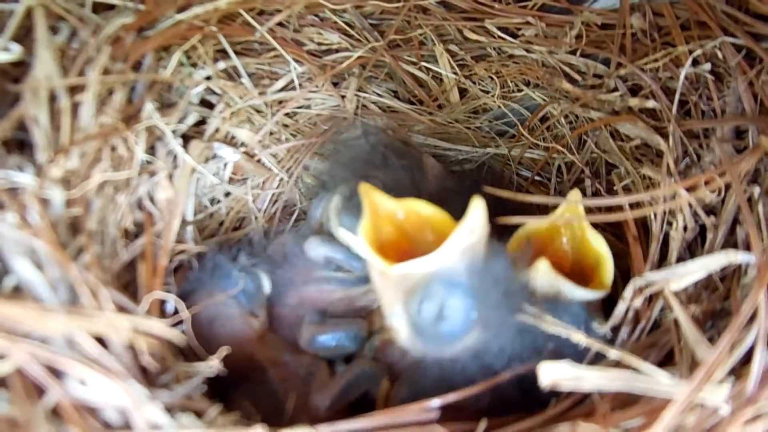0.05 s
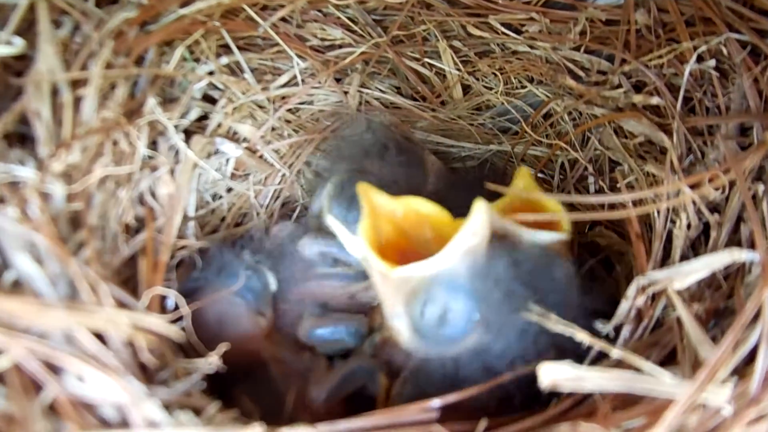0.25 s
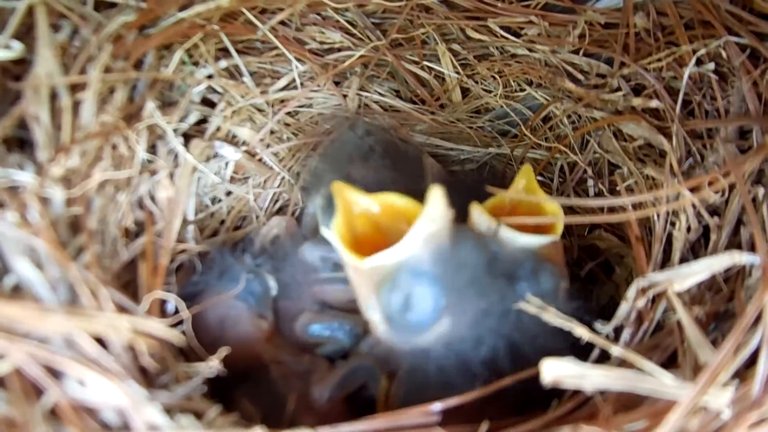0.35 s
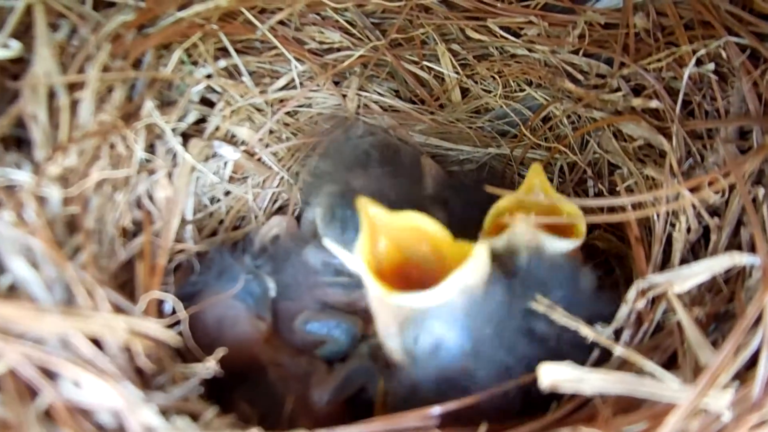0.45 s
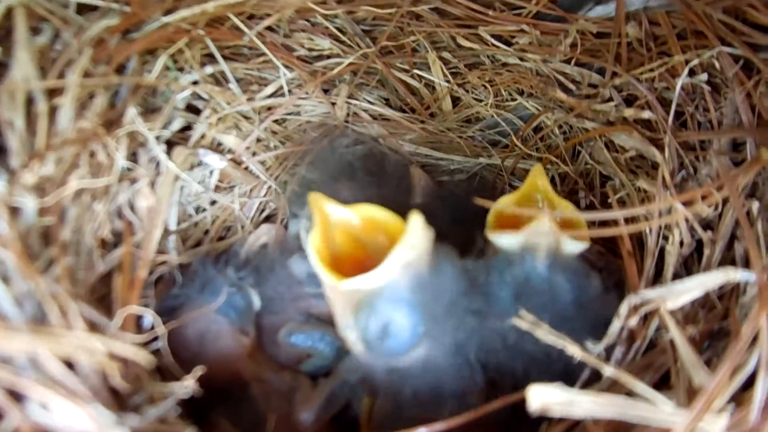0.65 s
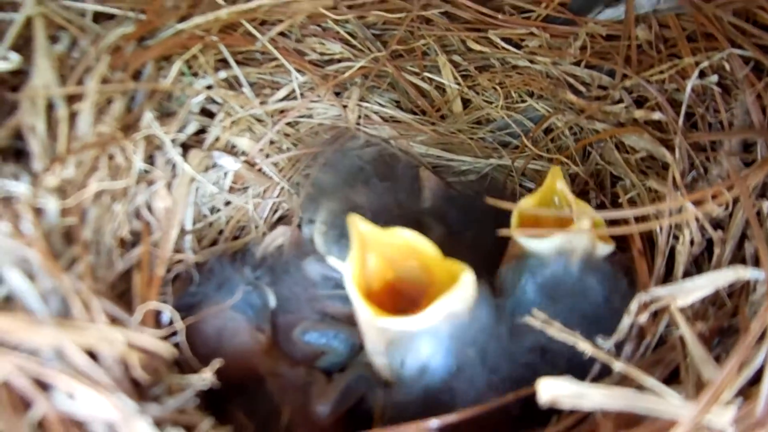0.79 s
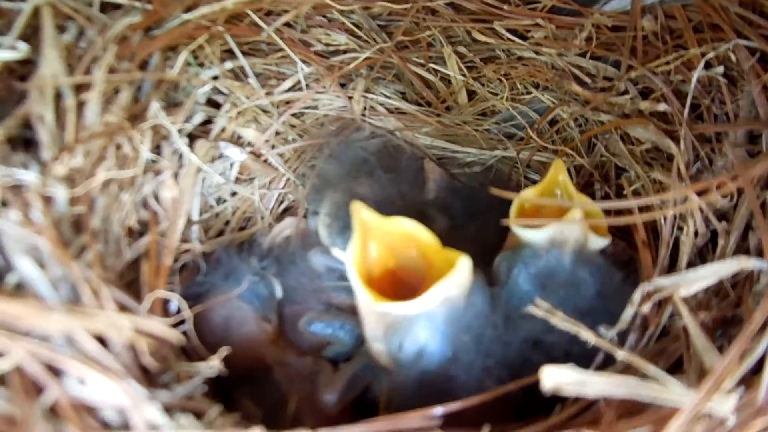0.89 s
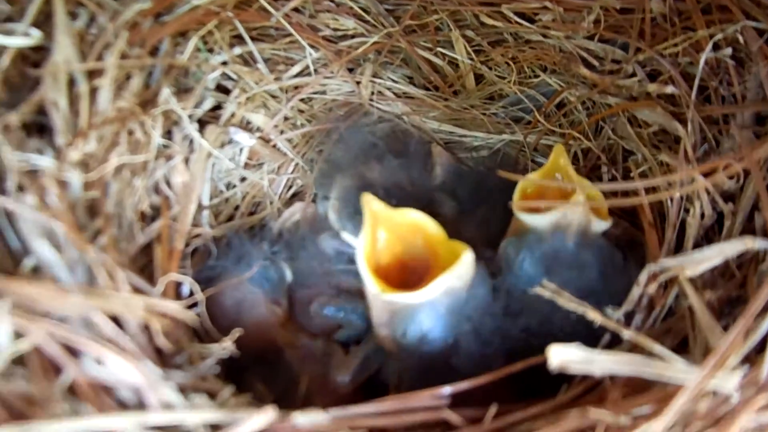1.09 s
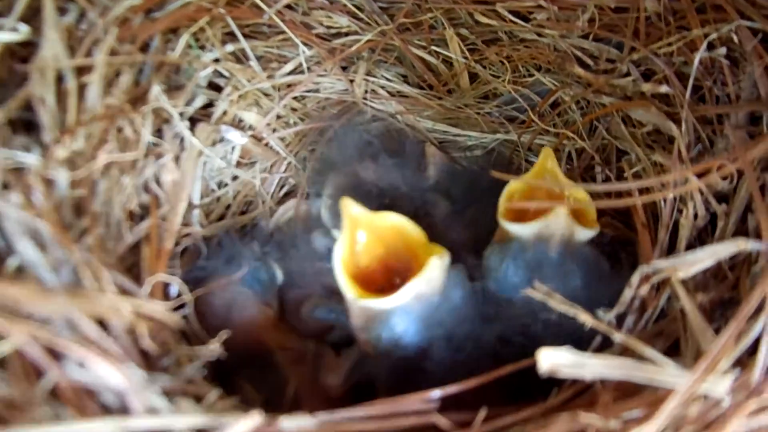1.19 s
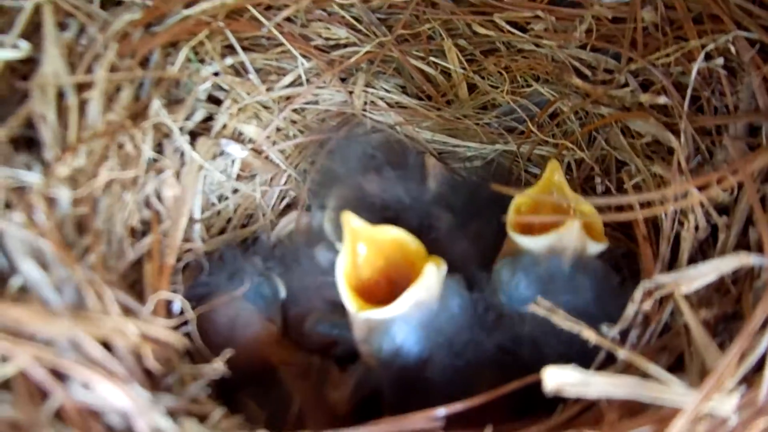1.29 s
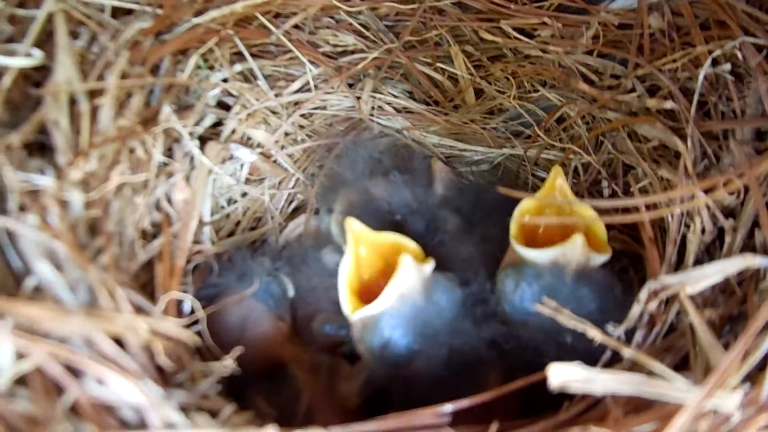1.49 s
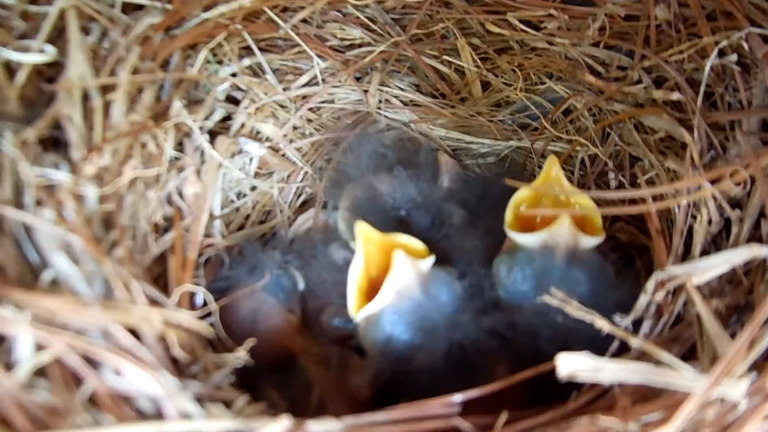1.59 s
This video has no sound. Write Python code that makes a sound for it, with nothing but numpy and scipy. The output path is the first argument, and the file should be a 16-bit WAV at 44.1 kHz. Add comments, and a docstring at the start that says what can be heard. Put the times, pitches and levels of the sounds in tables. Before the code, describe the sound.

Nestling birds beg with a thin wavering peep near the start and another at the end; between them, scuffs and hollow wooden bumps, heard very close inside a nest box with faint outdoor air.

```python
"""Nest box with nestlings begging inside: two thin, wavering peeps over quiet outdoor air.
Peeps are near-pure gliding whistles with a weak octave and a breathy rasp; air is coloured noise.
Scuffs are dense stick-slip clicks, bumps ring the modes of the wood, and the hollow rings on after both.
Snapping straws are tiny decaying bursts of narrow-band noise."""
import sys
import numpy as np
from scipy import signal
from scipy.fft import rfft, irfft
from scipy.io import wavfile
from scipy.ndimage import uniform_filter1d

SR = 44100
rng = np.random.default_rng(int(sys.argv[2]) if len(sys.argv) > 2 else 0)


def dump_mix(stems):
    """Bounce the given channels to the path in sys.argv[1] as a 16-bit WAV at rate SR."""
    frames = np.atleast_2d(stems).T  # one column per channel
    limited = np.clip(frames, -1, 1)  # hard clip at full scale
    pcm = np.round(limited * 32767).astype(np.int16)
    wavfile.write(sys.argv[1], SR, pcm)


N = 72765

# stereo width of the box's sounds: (frequency [Hz], side minus mid [dB])
BOX_WIDTH = [(100, -27), (520, -28), (800, -11.5), (1300, -2.5), (3500, 1.5), (12000, -2)]


def undb(db):
    """Decibels to amplitude gain."""
    return 10 ** (np.asarray(db) / 20)


def unit(x):
    """Scale to an rms of 1."""
    return x / np.sqrt(np.mean(x ** 2))


def walk(rate_hz):
    """Random drift with an rms of 1: white noise averaged twice over 1 / rate_hz."""
    window = int(SR / rate_hz)
    once = uniform_filter1d(rng.standard_normal(N), window)
    return unit(uniform_filter1d(once, window))


def colour(x, points):
    """Filter by a curve of (Hz, dB) points, interpolated over log frequency."""
    hz, db = np.array(points, float).T
    bin_hz = np.fft.rfftfreq(N, 1 / SR) + 1  # + 1 avoids log(0)
    gain = undb(np.interp(np.log(bin_hz), np.log(hz), db))
    return irfft(rfft(x) * gain, N)


def spread(pair, width):
    """Left and right from a mid and a side signal, the side weighted by frequency."""
    mid, side = pair[0], colour(pair[1], width)
    return np.array([mid + side, mid - side])


def band(x, hz, kind, order):
    """Butterworth filter, output at an rms of 1."""
    sos = signal.butter(order, hz, kind, fs=SR, output="sos")
    return unit(signal.sosfilt(sos, x))


def ring(modes, size=N // 4):
    """Exponentially decaying modes, one complex row each."""
    t = np.arange(size) / SR
    return np.array([undb(db - 60 * t / t60_s) * np.exp(2j * np.pi * hz * t) for hz, db, t60_s in modes])


def through(x, response):
    """Pass a sound through an impulse response by convolution."""
    return signal.fftconvolve(np.atleast_2d(x), np.atleast_2d(response), axes=1)[:, :N]


def air():
    """Quiet outdoor air: coloured noise whose level flickers slightly."""
    # noise spectrum: (frequency [Hz], relative density [dB per Hz])
    air_spectrum = [(15, -64), (25, -16.5), (99, -7), (183, -8), (227, -8), (267, -4.5), (331, 4),
                    (469, 1.5), (582, -6.5), (762, -16), (1020, -14), (1140, -13.5), (1620, -19),
                    (1900, -16.5), (3000, -23.5), (13400, -34), (14300, -43)]
    # stereo width: (frequency [Hz], side minus mid [dB])
    air_width = [(60, -16), (500, -20), (800, 1), (2000, -1), (12000, -0.5)]
    level_db, flicker_db = -53.5, .5
    noise = unit(colour(rng.standard_normal((2, N)), air_spectrum))
    return spread(noise, air_width) * undb(level_db + flicker_db * walk(30))


def scuffs():
    """Stick-slip clicks swell and die with each stroke's pressure; the straw catches and lets go."""
    # strokes: (peak time [s], rise [s per 20 dB], fall [s per 20 dB],
    #           bass, low middle, upper middle, treble, rim resonance [relative dB])
    strokes = [(0.062, 0.051, 0.067, -46.5, -37.5, -42.5, -52.5, -59),
               (0.078, 0.012, 0.016, -40.5, -26, -28.5, -40.5, -29.5),
               (0.287, 0.029, 0.075, -46, -48.5, -62, -64, -64),
               (0.346, 0.026, 0.063, -60, -43.5, -44, -54, -46),
               (0.385, 0.015, 0.021, -42, -36.5, -43, -61, -48),
               (0.562, 0.031, 0.023, -30, -32.5, -39, -50, -55),
               (0.587, 0.028, 0.029, -41, -30, -32, -39, -53),
               (0.604, 0.017, 0.021, -28, -26.5, -34, -47.5, -54),
               (0.908, 0.011, 0.042, -51.5, -50, -74, -87, -72),
               (1.237, 0.0045, 0.03, -49, -46, -49, -57.5, -58)]
    # colour of the rubbed surface: (frequency [Hz], level [dB])
    surface = [(70, -42), (150, -18), (220, -16.5), (330, 2.5), (550, -6.5), (900, -11.5), (1020, -17),
               (1300, -8), (1750, -16), (2000, -14.5), (2350, -21), (3000, -11.5), (4000, -21), (6500, -18),
               (9000, -23), (13400, -27), (14000, -51)]
    grains_per_s, grain_spread_db = 5000, 1
    bass_hz, middle_hz, treble_hz = 454, 1068, 3860  # band edges
    rim_hz, rim_width_hz = 2010, 230
    catch_db, catch_hz = 1.2, 450
    t = np.arange(N) / SR

    hits = rng.random(N) < grains_per_s / SR
    grain_db = grain_spread_db * np.minimum(rng.exponential(size=N), 3)
    slips = hits * undb(grain_db) * rng.choice([-1., 1.], (2, N))
    grit = colour(slips, surface)
    parts = [
        band(grit, bass_hz, "low", order=3),
        band(grit, [bass_hz, middle_hz], "band", order=3),
        band(grit, [middle_hz, treble_hz], "band", order=3),
        band(grit, treble_hz, "high", order=3),
        band(grit, [rim_hz - rim_width_hz / 2, rim_hz + rim_width_hz / 2], "band", order=2),
    ]
    rubbing = 0
    for peak_s, rise_s, fall_s, *levels_db in strokes:
        pressure = undb(-20 * np.maximum((peak_s - t) / rise_s, (t - peak_s) / fall_s))
        mix = sum(undb(db) * part for db, part in zip(levels_db, parts))
        rubbing = rubbing + pressure * mix
    catching = undb(catch_db * walk(catch_hz))
    return spread(rubbing * catching, BOX_WIDTH)


def bumps():
    """Soft pushes and hard ticks ring the wood; the struck spot sets the mix; deep bass barely radiates."""
    # knocks and ticks: (start [s], level [dB], contact [s], extra for the lowest mode [dB],
    #                    tilt of the modes [dB per octave])
    knocks = [(0.0617, -36, .0006, -3, 0), (0.0712, -22, .0003, 0, 1), (.0782, -25, .00025, -2, 4),
              (.0835, -33, .0003, 0, 3), (.286, -45, .002, 3, 0), (.326, -44, .0005, -6, 2),
              (.349, -47, .0003, -8, 5), (.381, -33, .0007, -10, 0), (.3872, -38, .0002, -8, 4),
              (0.5294, -14, .0017, 0, 0), (0.5581, -22, .0018, 0, 0), (0.595, -23, .0014, 4, 0),
              (0.6174, -27, .0019, 4, 0), (0.714, -41, .0016, 0, 0), (0.904, -44, .00085, -2, 0),
              (1.2345, -46, .00015, -2, 4.5), (1.2352, -34, .0013, 4, 0), (1.2695, -44, .0016, 3, 0),
              (1.358, -45, .0012, 0, 0)]
    # modes of the wooden box: (frequency [Hz], level [dB], t60 [s])
    wood = [(352, -3, .12), (484, 0, .05), (562, 0, .05), (665, -6, .04), (795, -4, .04), (1270, -13, .04),
            (1985, -8, .045), (2720, -18, .045), (3320, -17, .035), (4880, -26, .03)]
    tilt_pivot_hz, highpass_hz = 500, 250
    t = np.arange(N) / SR
    modes = ring(wood)
    index = np.arange(len(wood))
    octaves = np.log2(np.array(wood)[:, 0] / tilt_pivot_hz)
    ringing = 0
    for start_s, db, contact_s, lowest_db, tilt_db in knocks:
        push = np.sin(np.pi * np.clip((t - start_s) / contact_s, 0, 1))
        # neighbouring modes swing in opposite directions
        gains = (-1) ** index * undb(db + lowest_db * (index == 0) + tilt_db * octaves)
        knock = np.sum(gains[:, None] * modes, axis=0)
        # mid and side are a quarter cycle apart
        ringing = ringing + through(push / push.sum(), [knock.imag, knock.real])
    sos = signal.butter(2, highpass_hz, "high", fs=SR, output="sos")
    return signal.sosfilt(sos, spread(ringing, BOX_WIDTH))


def box(x):
    """The hollow's resonances ring on after each contact, with a faint dull echo of decaying noise."""
    # resonances of the hollow: (frequency [Hz], level [dB], t60 [s])
    hollow_modes = [(350, -8, .38), (376, -1, .5), (581, -4, .3), (619, 3, .42), (678, -6, .45),
                    (764, 4, .25), (813, -5, .5), (845, 0, .25), (892, 5, .45), (1253, -3, .35),
                    (1302, 0, .38)]
    hollow_peak_db = 7.5
    echo_db, echo_t60_s = -27.5, 0.54
    t = np.arange(N) / SR
    hollow = ring(hollow_modes).real.sum(axis=0)
    hollow = hollow / np.abs(rfft(hollow)).max()  # peak gain of 1
    dull = colour(rng.standard_normal((2, N)), [(900, 5.0), (2500, -13.0), (8000, -13)])
    echo = spread(dull, BOX_WIDTH) * undb(-60 * t / echo_t60_s)
    echo = echo / np.sqrt(np.sum(echo ** 2) / 10)
    return x + undb(hollow_peak_db) * through(x, hollow) + undb(echo_db) * through(x, echo)


def peep(curve, overtone_db):
    """Near-pure whistle, weak octave and rasp; standing waves shift its stereo place with pitch."""
    # how a pitch reaches the two ports: (frequency [Hz], left minus right [dB], left lead [rad])
    ports = [(4160, 18, 1.6), (4330, 4, 1.9), (4550, 16, 4.1), (4950, -6, 3.4), (5030, -5, 3.7),
             (5270, -7, 2.6), (5400, 1, 0.98)]
    attack_s, release_s = 0.0048, 0.024
    jitter, shimmer_db = .002, .4  # jitter as a fraction of pitch
    rasp_start_db, rasp_end_db, sweep_s = -23, -43, 0.063
    t = np.arange(N) / SR
    s, hz, db = np.array(curve, float).T

    glide_hz = uniform_filter1d(np.interp(t, s, hz), size=300)
    pitch_hz = glide_hz * (1 + jitter * walk(440))
    phase = 2 * np.pi * np.cumsum(pitch_hz) / SR
    fade_in = np.clip((t - s[0]) / attack_s + 1, 0, 1)
    fade_out = np.clip((s[-1] - t) / release_s + 1, 0, 1)
    loud = (fade_in * fade_out) ** 2 * undb(np.interp(t, s, db) + shimmer_db * walk(270))

    port_hz, port_db, port_lead_rad = np.array(ports).T
    sides = np.array([[.5], [-.5]])  # left, right
    gains = undb(sides * np.interp(pitch_hz, port_hz, port_db))
    gains = gains / np.sqrt(np.mean(gains ** 2, axis=0))
    tone = gains * np.sin(phase + sides * np.interp(pitch_hz, port_hz, port_lead_rad))

    overtone_s = np.linspace(s[0], s[-1], len(overtone_db))
    octave = undb(np.interp(t, overtone_s, overtone_db)) * np.sin(2 * phase + sides)
    rasp_db = np.interp(t, [s[0], s[0] + sweep_s], [rasp_start_db, rasp_end_db])
    breath = np.array([walk(3000), walk(3000)])
    rasp = undb(rasp_db) * breath * np.sin(phase)
    return np.sqrt(2) * loud * (tone + octave + rasp)


def straws():
    """Snapping straws: tiny dry ticks of decaying noise, each around its own pitch."""
    # snaps: (time [s], pitch [Hz], level [dB], t60 [s])
    snaps = [(.431, 6900, -47.5, 0.0074), (0.53, 4700, -40.5, 0.018), (0.531, 8350, -42, 0.011),
             (1.233, 3200, -45.5, 0.052), (1.354, 2120, -40, 0.012)]
    width = 0.074  # band edges: pitch divided and multiplied by 1 + width
    t = np.arange(N) / SR
    ticks = 0
    for start_s, hz, db, t60_s in snaps:
        noise = rng.standard_normal((2, N))
        crackle = band(noise, [hz / (1 + width), hz * (1 + width)], "band", order=2)
        decay = undb(db - 60 * np.abs(t - start_s) / t60_s)
        ticks = ticks + crackle * (t >= start_s) * decay
    return ticks


def scene():
    """Sum of air, contacts with the box, two peeps and straws."""
    # pitch curves of the peeps: (time [s], pitch [Hz], level [dB])
    first_curve = [(0.137, 4280, -52), (0.14, 4430, -42), (0.153, 4849, -37), (0.168, 5250, -42),
                   (0.185, 5611, -39), (0.203, 5591, -39), (0.229, 5319, -44), (0.243, 5296, -44),
                   (0.274, 5668, -40), (0.297, 5648, -40), (0.32, 5272, -44), (0.345, 5232, -45),
                   (0.374, 5000, -45), (0.388, 4720, -53)]
    second_curve = [(1.466, 4020, -52), (1.472, 4230, -36), (1.485, 4860, -39), (1.498, 5252, -40),
                    (1.514, 5330, -42), (1.536, 5140, -40), (1.553, 4950, -39), (1.598, 4910, -38),
                    (1.629, 5055, -39), (1.647, 4932, -39)]
    # octave against the fundamental at start, midway and end [dB]
    first_overtone_db, second_overtone_db = (-12.5, -17, -37), (-14, -26, -36)
    contacts = box(scuffs() + bumps())
    peeps = peep(first_curve, first_overtone_db) + peep(second_curve, second_overtone_db)
    return air() + contacts + peeps + straws()


def record(dry):
    """The recorder cuts the top: a steep elliptic low-pass."""
    top_hz = 15750
    return signal.sosfilt(signal.ellip(8, .2, 70, top_hz, fs=SR, output="sos"), dry)


dry = scene()
out = record(dry)
dump_mix(out)
```